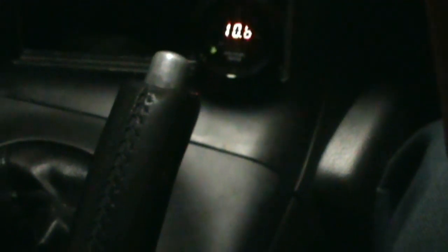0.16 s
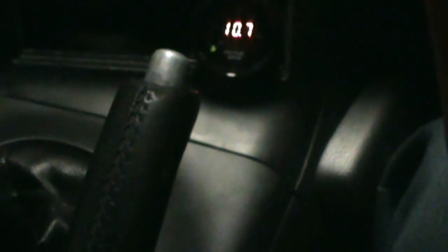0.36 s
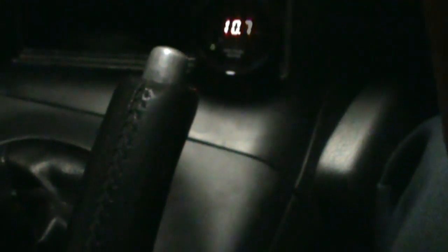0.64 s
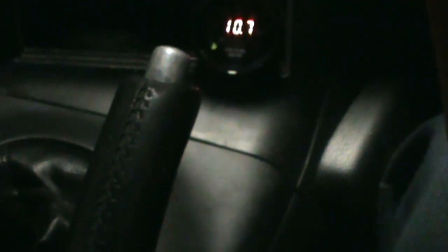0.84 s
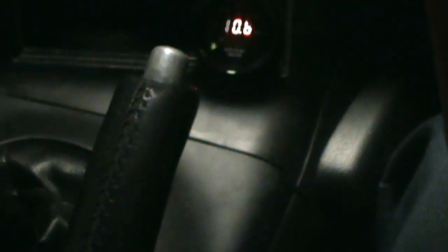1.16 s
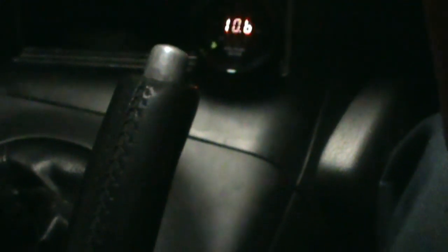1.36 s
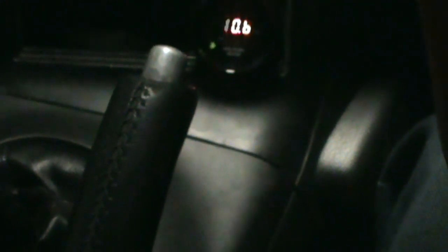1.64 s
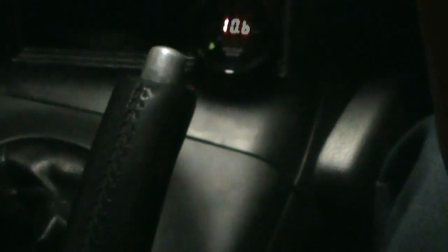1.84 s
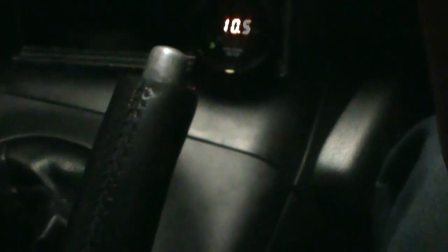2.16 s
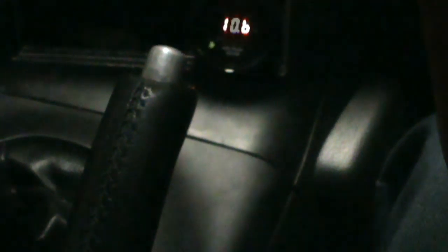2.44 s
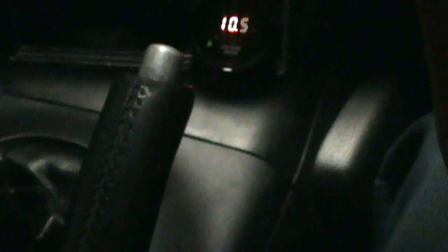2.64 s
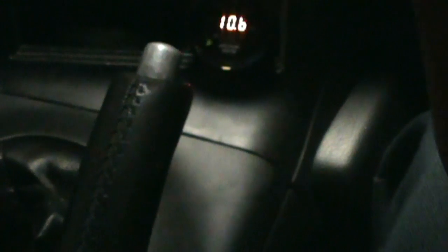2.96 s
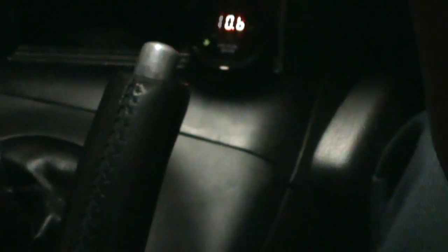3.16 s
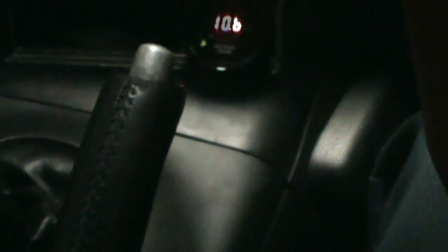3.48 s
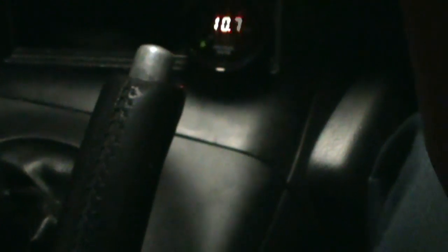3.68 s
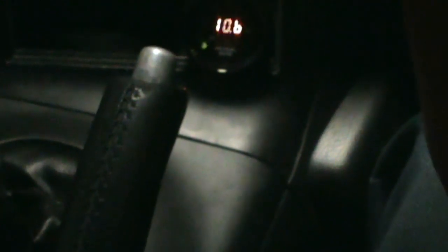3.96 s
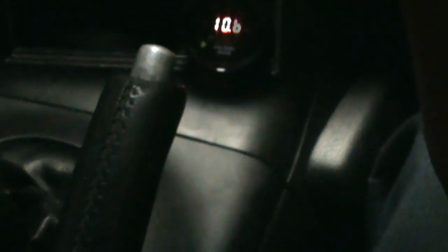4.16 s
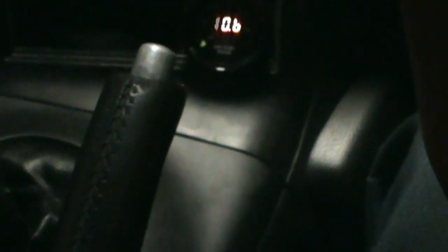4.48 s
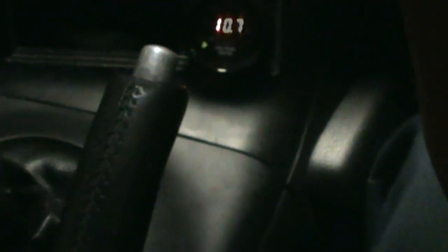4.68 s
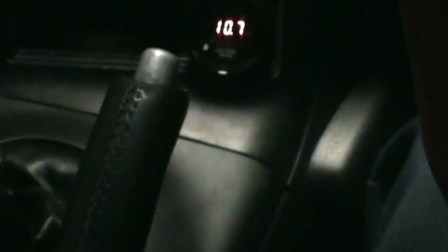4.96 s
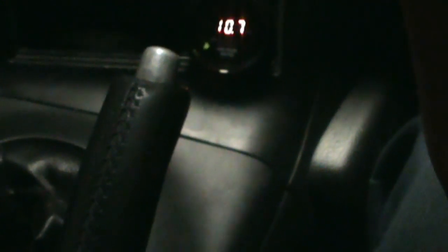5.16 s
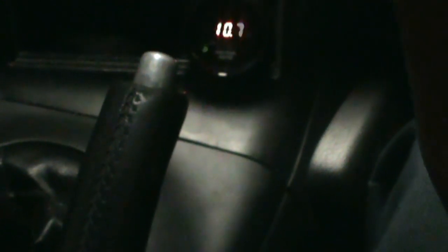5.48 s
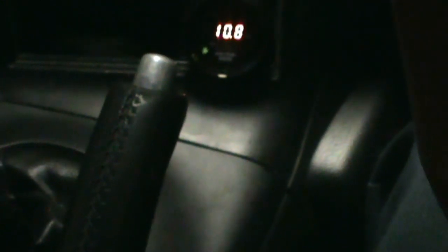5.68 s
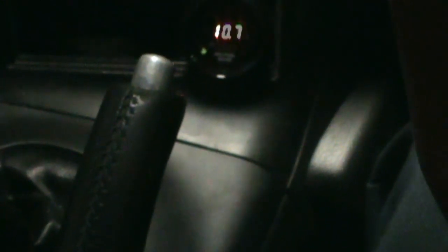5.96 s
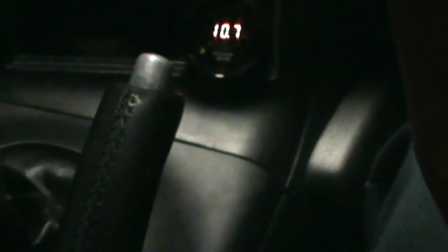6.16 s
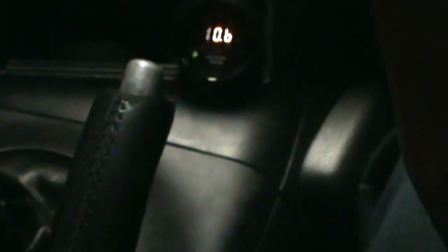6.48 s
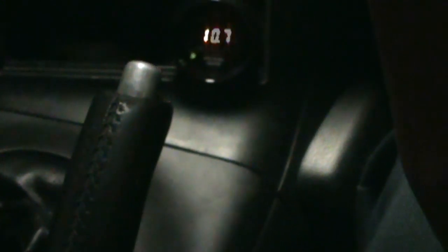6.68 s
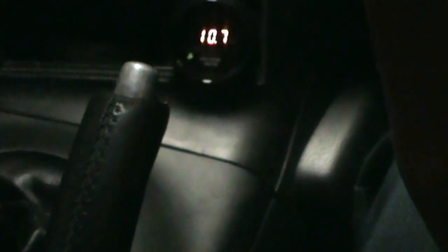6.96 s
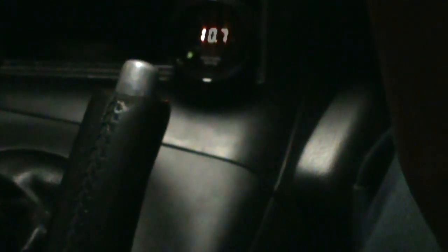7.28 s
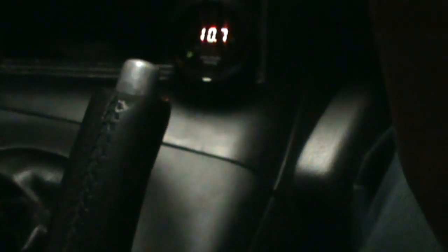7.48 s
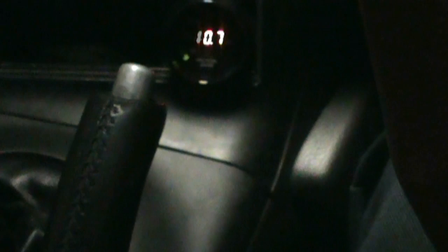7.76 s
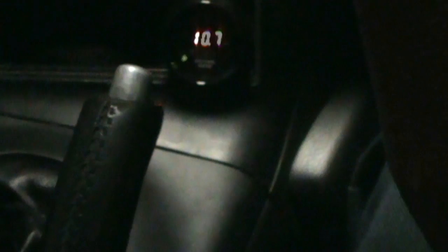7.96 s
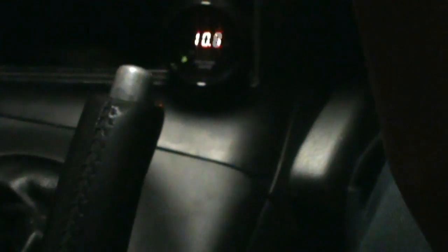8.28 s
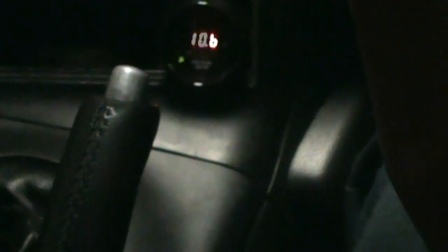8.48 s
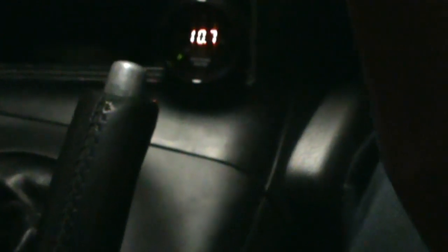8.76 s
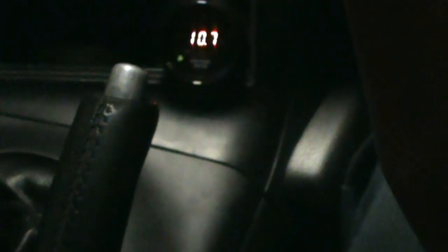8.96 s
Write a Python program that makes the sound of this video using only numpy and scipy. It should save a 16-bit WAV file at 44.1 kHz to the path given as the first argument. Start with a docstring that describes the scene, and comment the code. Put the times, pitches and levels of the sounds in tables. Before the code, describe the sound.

From a microphone in the cabin of a parked car, an idling engine makes a continuous, muffled drone with an irregular burble. Pulleys hum and whine faintly, and the belt sings briefly when the idle dips a little. A few small plastic ticks from the interior trim come and go nearby, with a light hiss underneath.

```python
"""Inside the cabin of a parked car, a stereo microphone hears a two-rotor engine idle beyond the bulkhead.
Two exhaust puffs per shaft turn drone through the body; their uneven strength makes the burble.
Belt-driven parts hum and whine, the engine bay rustles in step with the shaft, and the belt sings
when the idle sags. Closer by, cabin trim ticks faintly over the microphone's own hiss."""
import sys
import numpy as np
from scipy.fft import rfft, irfft, next_fast_len
from scipy.io import wavfile
from scipy.ndimage import map_coordinates

SR = 44100
rng = np.random.default_rng(int(sys.argv[2]) if len(sys.argv) > 2 else 0)


def int16_out(signal):
    """Quantize to a 16-bit WAV file."""
    q = np.round(np.clip(np.atleast_2d(signal).T, -1, 1) * 32767)
    wavfile.write(sys.argv[1], SR, q.astype(np.int16))


N = 402191


def amp(db):
    """Decibels to gain."""
    return 10 ** (np.asarray(db) / 20)


def unit(x):
    """Scale to rms 1."""
    return x / np.sqrt(np.mean(x ** 2) + 1e-20)


def along(points, hz):
    """Read (frequency [Hz], value) points on a log frequency axis."""
    freqs, values = np.transpose(points)
    return np.interp(np.log(hz + 1), np.log(freqs + 1), values)


def wobble(rate):
    """A smooth random curve with `rate` knots a second."""
    knots = rng.standard_normal(int(N * rate / SR) + 4)
    coarse = np.arange(0, N + 64, 64)
    return np.interp(np.arange(N), coarse, map_coordinates(knots, [coarse * rate / SR]))


def filtered(x, response):
    """Filter x by a complex function of frequency."""
    size = 2 * next_fast_len((x.shape[-1] + SR // 4) // 2)
    spectrum = rfft(x, size) * response(np.fft.rfftfreq(size, 1 / SR))
    return irfft(spectrum, size)[..., :x.shape[-1]]


def causal(gain):
    """The minimum-phase response with these evenly spaced gains: it rings only after its blow."""
    cepstrum = irfft(np.log(np.maximum(gain, 1e-6)))
    half = len(cepstrum) // 2
    cepstrum[1:half] *= 2
    cepstrum[half + 1:] = 0
    return np.exp(rfft(cepstrum))


def resonance(f, hz, width):
    """Band-pass response of one damped resonance."""
    return 1j * f * width / (hz * hz - f * f + 1j * f * width)


def noise(response):
    """Filtered stereo noise of rms 1, nearly mono in the bass."""
    # likeness of left and right at the microphone: (frequency [Hz], correlation [0..1])
    likeness = [(60, 0.81), (300, 1), (700, 0.34), (2000, 0.7), (8000, 0.44), (15000, 0.68)]

    def mid_and_side(f):
        angle = np.arccos(along(likeness, f)) / 2
        return response(f) * np.array([np.cos(angle), np.sin(angle)])

    mid, side = filtered(rng.standard_normal((2, N)), mid_and_side)
    return unit(np.array([mid + side, mid - side]))


def panned(left_db):
    """Channel gains that put the left `left_db` above the right."""
    return amp([[left_db / 2], [-left_db / 2]])


def exhaust_drone(turns, excess_speed, buzz_db=-51.5, buzz_db_per_octave=-17, waver_db=0.42):
    """The steady part of the puffs; as the speed hunts, orders slide on and off cabin resonances."""
    # exhaust tones in the cabin: (order [cycles per turn], left level [dB], right level [dB])
    tones = [(1, -37.5, -37.0), (2, -26.0, -23.0), (3, -38.0, -37.0), (4, -23.5, -14.5), (5, -34.0, -28.5),
             (6, -38.0, -27.5), (7, -41.5, -41.5), (8, -25.5, -24.0), (9, -32.0, -34.5), (10, -20.5, -19.5),
             (11, -36.5, -34.5), (12, -30.0, -33.0), (13, -44.0, -48.0), (14, -45.0, -46.5),
             (15, -50.5, -49.5), (16, -39.5, -42.5)]
    # orders on the flank of a resonance: {order [cycles per turn]: gain [dB per extra turn/s]}
    flanks = {2: 2, 4: 7, 8: -9, 10: -2, 12: 6}
    pipe_delay_turns, delay_turns_per_order = 0.285, 0.0828  # the silencer holds high orders back longer
    shift_cycles, rotor_skew_cycles = 0.17, 0.13  # the two rotors differ, so odd orders come later
    buzz_orders = len(tones) + 1 + np.arange(13)
    buzz_levels = buzz_db + buzz_db_per_octave * np.log2(buzz_orders / buzz_orders[0])
    out = np.zeros((2, N))
    for order, left_db, right_db in [*tones, *zip(buzz_orders, buzz_levels, buzz_levels)]:
        delay = pipe_delay_turns + delay_turns_per_order * order
        phase = 2 * np.pi * (order * (turns - delay) - shift_cycles - rotor_skew_cycles * (order % 2))
        lead = 0.44 * min(order / 6, 1)  # radians; long waves reach both microphone ports alike
        swell = amp(flanks.get(order, 0) * excess_speed + waver_db * wobble(7.2))
        out[0] += swell * amp(left_db) * np.cos(phase + lead)
        out[1] += swell * amp(right_db) * np.cos(phase - lead)
    return np.sqrt(2) * out


def exhaust_burble(turns, puff_db=-37.5, gas_db=-34.3, pulse_db=2.5):
    """Each firing burns a little stronger or weaker and leaves turbulent gas in the pipe."""
    # one puff as it reaches the cabin: (frequency [Hz], relative level [dB])
    puff_spectrum = [(8, -28), (22, -9), (40, -15), (65, -7), (110, 0), (170, -6), (260, -4), (320, -10),
                     (430, -15), (560, -23), (1200, -50), (4000, -110)]
    firings = np.flatnonzero(np.diff(np.floor(2 * turns)) > 0)
    kicks = np.zeros(N)
    kicks[firings] = rng.uniform(-1, 1, len(firings))
    puffs = unit(filtered(kicks, lambda f: causal(amp(along(puff_spectrum, f)))))
    pulsing = unit(amp(pulse_db * np.cos(4 * np.pi * turns)))
    gas = pulsing * noise(lambda f: amp(along(puff_spectrum, f)))
    return panned(-9.0) * (amp(puff_db) * puffs + amp(gas_db) * gas)


def accessory_whines(turns, slip_rad=0.15, waver_db=1.2):
    """Driven parts follow the shaft; the belt lets them wander a little."""
    # pumps, pulleys and gears: (ratio [cycles per turn], left level [dB], right level [dB])
    whines = [(2.67, -43.5, -40.0), (5.33, -44.5, -44.0), (10.67, -40.0, -34.5), (13.33, -48.0, -48.0),
              (17.84, -53.0, -52.5), (18.67, -52.0, -49.5), (24, -52.0, -48.5), (29.33, -48.5, -55.0),
              (35, -59.5, -62.0), (48.47, -66.0, -65.0), (58.16, -66.5, -63.5), (78.45, -66.5, -70.5),
              (109.33, -77.5, -82.5)]
    out = np.zeros((2, N))
    for ratio, left_db, right_db in whines:
        phase = 2 * np.pi * (ratio * turns + rng.random()) + slip_rad * wobble(12)
        tone = unit(amp(waver_db * wobble(7)) * np.sin(phase))
        out += amp([[left_db], [right_db]]) * tone
    return out


def engine_bay(turns, rush_db=-43.5, rattle_db=-53, throb_db=0.66, flutter_db=1.14):
    """Mechanical rush and rattling panels swell with every firing and every shaft turn."""
    # the bay heard through the bulkhead: (frequency [Hz], relative level [dB])
    bay_spectrum = [(100, -49), (400, -14), (540, 1), (900, 0), (1100, -6.5), (1300, -5.5), (1650, -13),
                    (2000, -14), (2400, -20), (5000, -29), (11000, -51), (16000, -41)]
    # panels and brackets that the engine rattles: (frequency [Hz], width [Hz], relative level [dB])
    panels = [(724.2, 30, -2.5), (1433, 20, -10), (1933, 27, -12.5), (2706, 170, -20), (4104, 140, -27.5),
              (4750, 49, -19.5), (4990, 120, -25.5), (6320, 59, -25.5), (7000, 370, -28.5),
              (10950, 440, -35)]
    throb = amp(throb_db * (np.cos(4 * np.pi * turns) + np.cos(2 * np.pi * turns)))
    rush = noise(lambda f: amp(along(bay_spectrum, f))) * amp(flutter_db * wobble(60))
    rattle = noise(lambda f: sum(amp(db) * resonance(f, hz, width) ** 2 for hz, width, db in panels))
    rattle *= amp(0.6 * wobble(25))
    return panned(2.0) * throb * (amp(rush_db) * rush + amp(rattle_db) * rattle)


def ignition_sizzle(turns, level_db=-62, decay_firings=0.61, centre_hz=5500, width_hz=7000):
    """Ignition and injectors add a thin spit of treble at each firing."""
    firing, since_firing = np.divmod(2 * turns, 1)
    strengths = rng.uniform(0.4, 1, int(firing.max()) + 1)
    spits = unit(strengths[firing.astype(int)] * np.exp(-since_firing / decay_firings))
    return amp(level_db) * spits * noise(lambda f: resonance(f, centre_hz, width_hz) ** 2)


def self_noise(hiss_db=-57, whistle_db=-77, whistle_hz=15734):
    """The camera's microphone and electronics add their own hiss and a thin whistle."""
    # microphone hiss: (frequency [Hz], relative level [dB])
    hiss_spectrum = [(300, -9), (3000, 4), (6000, -1), (8500, -0.5), (11000, 0.5), (13000, -4.5),
                     (16000, -8)]
    hiss = noise(lambda f: amp(along(hiss_spectrum, f)))
    whistle = np.sqrt(2) * np.sin(2 * np.pi * whistle_hz * np.arange(N) / SR)
    return amp(hiss_db) * hiss + amp(whistle_db) * whistle


def belt_chirp(speed, chirp_hz=1420, slip_rad=0.43, level_db=-53.5, flutter_db=2):
    """Whenever the idle sags, a belt-driven whine drops onto a pulley resonance and sings for a moment."""
    sag_speed, sag_width = 24.45, 0.1  # turns/s: where it sings loudest, and how near the shaft must be
    t = np.arange(N) / SR
    slipping = np.exp(-((speed - sag_speed) / sag_width) ** 2)
    swell = slipping * amp(level_db + flutter_db * wobble(14))
    return swell * np.sqrt(2) * np.sin(2 * np.pi * chirp_hz * t + slip_rad * wobble(50))


def trim_ticks(attack_s=0.0006, gain_db=13.5, faint_per_s=1.2, scatter_db=1.2):
    """Each tick of the cabin trim is a dull plastic knock, a short bright ring and a broad snap."""
    # the clearest ticks, before gain_db: (time [s], knock [dB], ring [dB], snap [dB])
    clear_ticks = [(0.583, -56, -49, -62), (1.712, -51, -63, -57), (4.285, -56, -58, -57),
                   (5.131, -49, -47, -59), (5.411, -55, -51, -61), (5.632, -43, -60, -56),
                   (5.875, -45, -56, -54), (6.312, -49, -63, -63), (7.189, -41, -63, -68),
                   (7.603, -42, -71, -66)]
    # the three parts of a tick, each: (frequency [Hz], relative level [dB])
    knock = [(600, -20), (1100, -3), (1600, 0), (2200, -1), (2550, -13), (5000, -26), (12000, -50)]
    ring = [(1500, -24), (3000, -13), (5000, -11), (6000, 0), (7100, 0), (7900, -14), (14000, -30)]
    snap = [(600, -10), (2500, 3), (5000, 0), (11000, -2), (15500, -12)]
    t60s, faint_db = (0.02, 0.026, 0.036), (-54, -66, -65)  # knock, ring, snap
    t = np.arange(SR // 10) / SR
    onset = 1 - np.exp(-t / attack_s)
    parts = [noise(lambda f: amp(along(spectrum, f))) for spectrum in (knock, ring, snap)]
    faint_ticks = [(rng.uniform(0, (N - 2 * len(t)) / SR), *rng.normal(faint_db, scatter_db))
                   for _ in range(round(faint_per_s * N / SR))]
    out = np.zeros((2, N))
    for start_s, *levels in [*clear_ticks, *faint_ticks]:
        span = slice(round(start_s * SR), round(start_s * SR) + len(t))
        for db, part, t60 in zip(levels, parts, t60s):
            out[:, span] += onset * amp(gain_db + db - 60 * t / t60) * part[:, span]
    return out


def scene():
    """The cabin at the microphone: one slightly hunting shaft drives every engine sound."""
    # the hunting idle: (time [s], shaft speed [turns/s])
    idle = [(0.0, 24.61), (0.36, 24.68), (0.5, 24.42), (0.88, 24.83), (0.94, 24.66), (1.44, 24.58),
            (1.74, 24.95), (2.74, 24.52), (2.9, 24.79), (3.3, 24.64), (3.38, 24.43), (3.7, 24.85),
            (4.08, 24.87), (5.08, 24.55), (5.48, 24.78), (5.7, 24.56), (5.78, 24.38), (5.96, 24.75),
            (6.9, 24.82), (7.04, 25.05), (7.36, 24.79), (8.42, 24.98), (8.74, 24.79), (9.11, 24.8)]
    speed = np.interp(np.arange(N) / SR, *np.transpose(idle))
    turns = np.cumsum(speed) / SR
    exhaust = exhaust_drone(turns, speed - speed.mean()) + exhaust_burble(turns)
    machinery = accessory_whines(turns) + belt_chirp(speed) + engine_bay(turns) + ignition_sizzle(turns)
    return exhaust + machinery + trim_ticks() + self_noise()


def record(dry):
    """The camera passes nothing above its band limit."""
    top_hz, edge_hz = 15820, 60
    return filtered(dry, lambda f: np.clip((top_hz - f) / edge_hz, 0, 1))


dry = scene()
out = record(dry)
int16_out(out)
```